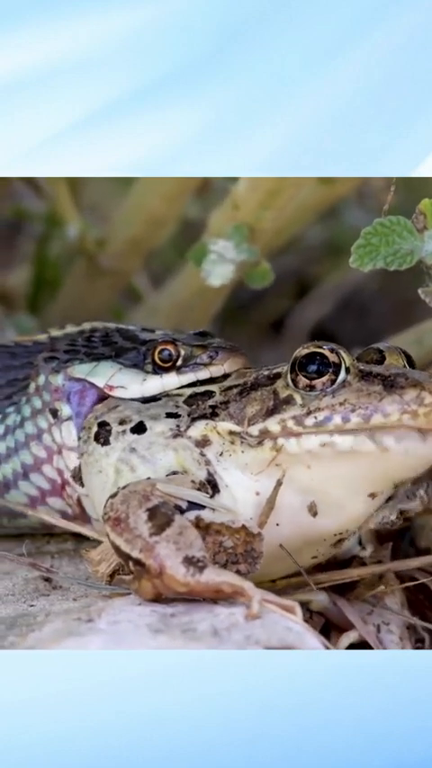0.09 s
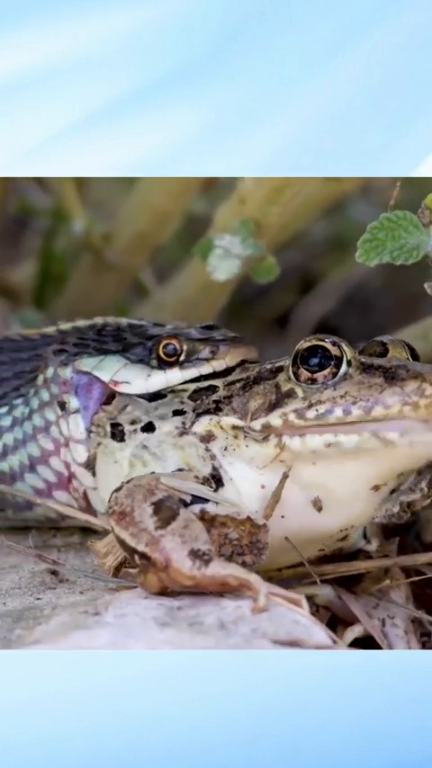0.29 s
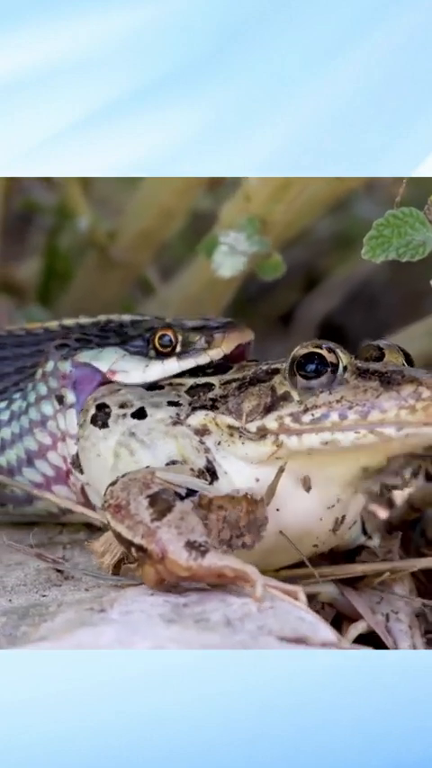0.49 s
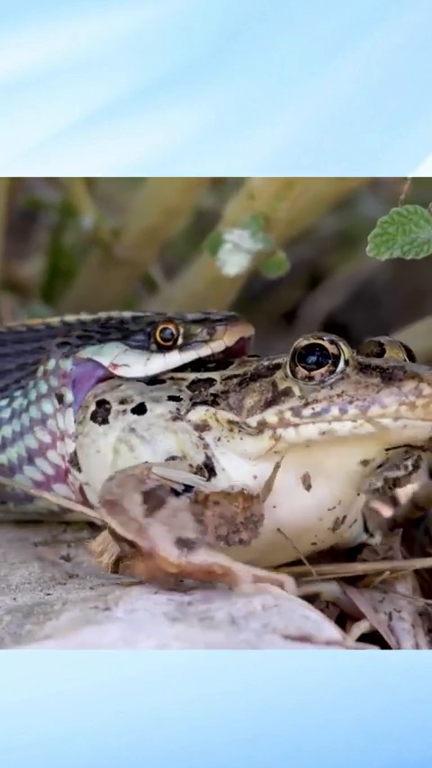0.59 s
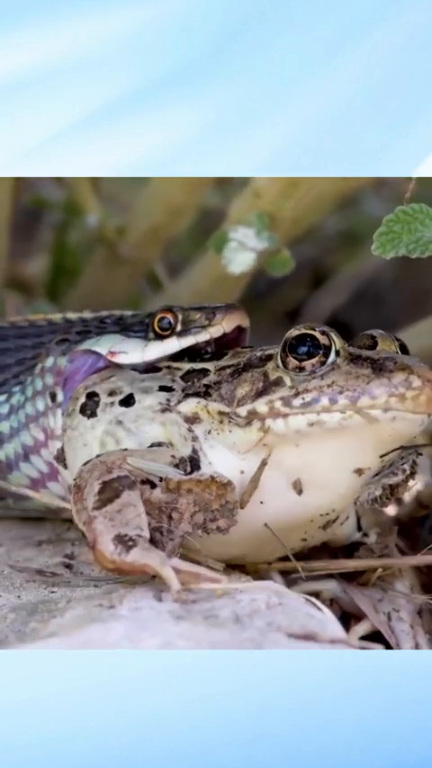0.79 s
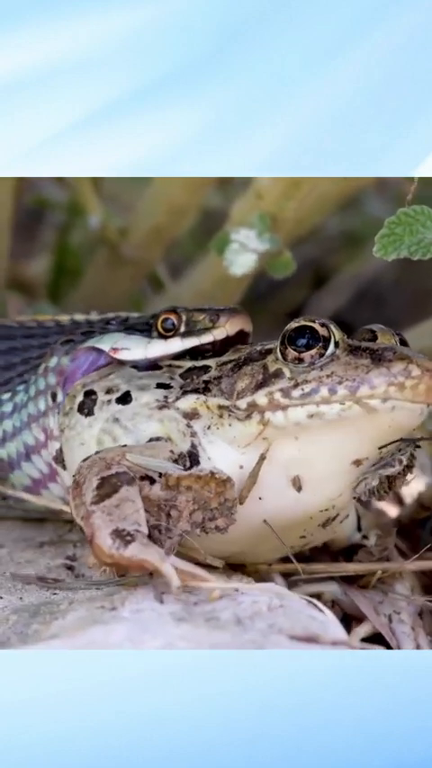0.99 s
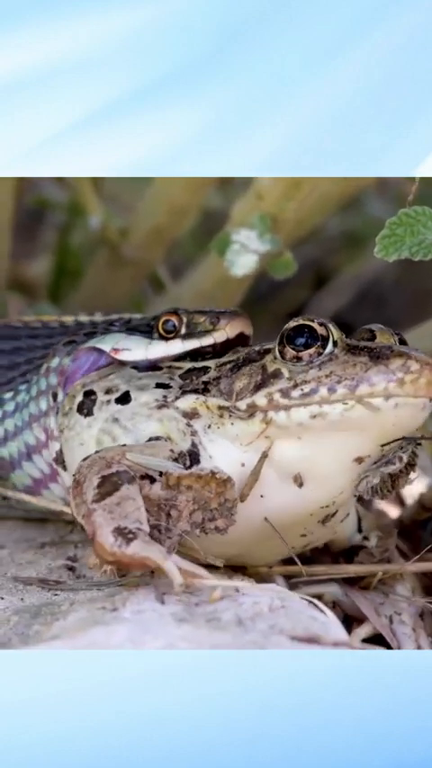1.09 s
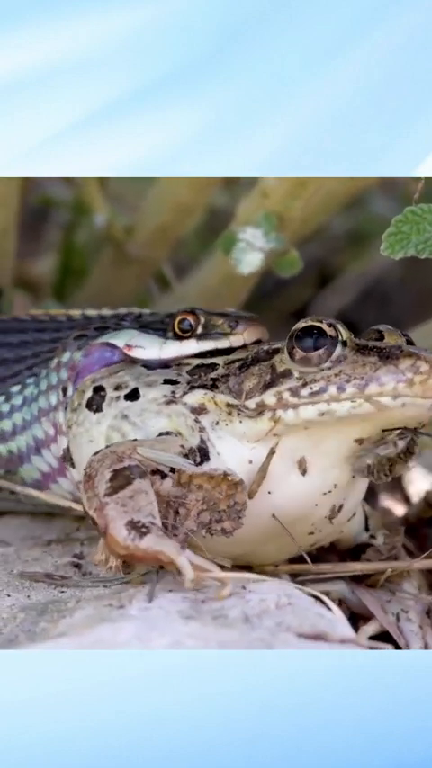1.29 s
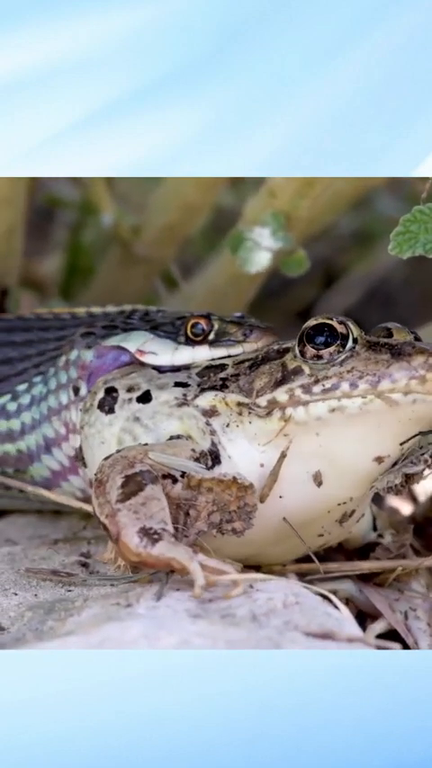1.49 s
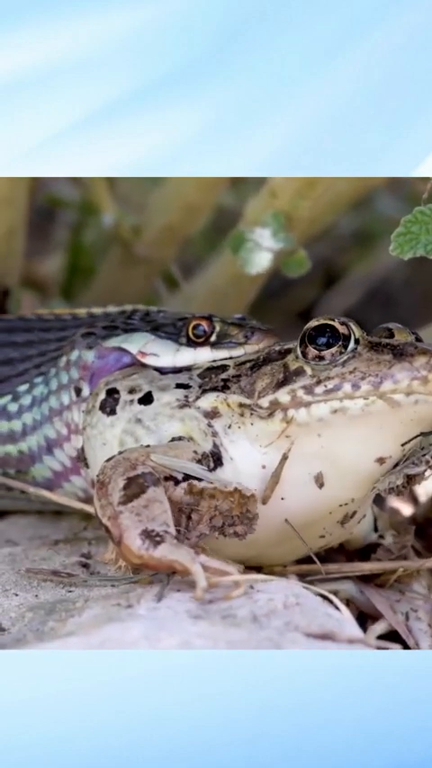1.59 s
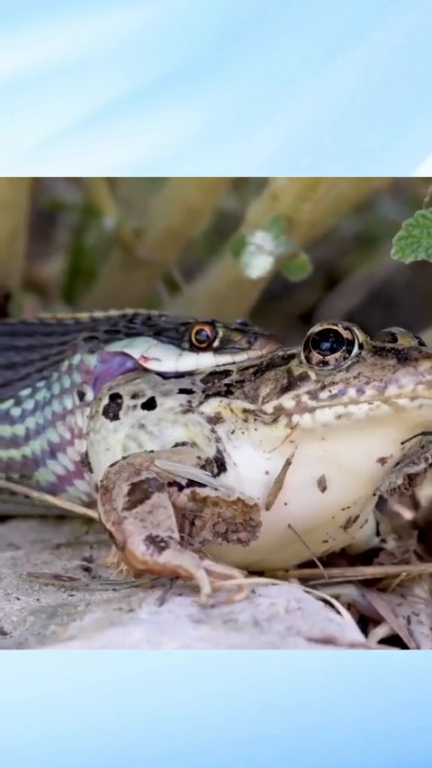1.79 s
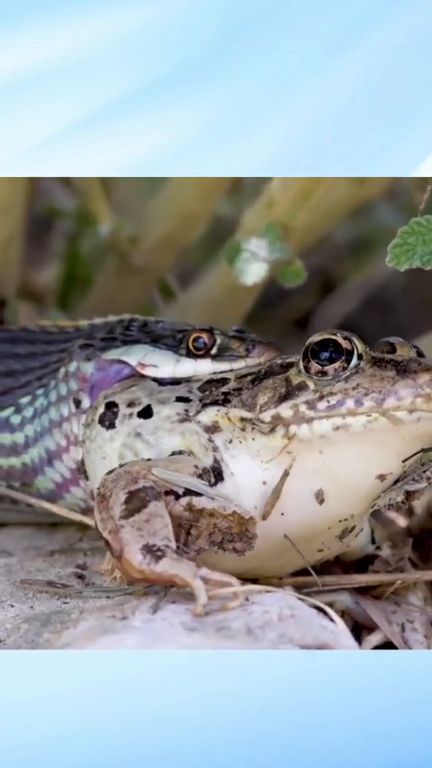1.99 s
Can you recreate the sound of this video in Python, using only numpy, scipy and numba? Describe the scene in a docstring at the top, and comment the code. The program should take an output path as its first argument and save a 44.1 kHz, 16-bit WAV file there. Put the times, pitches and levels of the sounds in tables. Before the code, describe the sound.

Close outdoor capture of a frog's scream in the first half second, rough and quiet at first, then piercing and pitched, dulling as the mouth closes; then tiny litter clicks over steady electrical-like hum and airy hiss.

```python
"""Scream of a captured frog

A frog held by a snake moans faintly, then breaks into one short wailing scream: a train of larynx
pulses, rough at first, that rises to a clear pitch and dulls as filters follow the closing mouth.
Dry litter ticks under the two animals as decaying resonant noise, with a faint short echo.
A low hum and a soft rumble, a high hiss and a thin whine go on behind, from sines and shaped noise."""
import sys
import numpy as np
from scipy import signal
from scipy.fft import rfft, irfft
from scipy.io import wavfile
from scipy.ndimage import uniform_filter1d
from numba import njit

SR = 44100
rng = np.random.default_rng(int(sys.argv[2]) if len(sys.argv) > 2 else 0)


def unload_audio(sound):
    """Save the sound as a 16-bit wav file, at the path given as the first command line argument."""
    columns = np.transpose(np.atleast_2d(sound))
    # keep every value between -1 and 1, then stretch to whole-number steps
    steps = np.round(np.clip(columns, -1, 1) * 32767)
    wavfile.write(sys.argv[1], SR, steps.astype(np.int16))


N = 88200
T = np.arange(N) / SR
CUTOFF_HZ = 15800  # upper limit of the whole sound


def from_db(db):
    """Level law: decibels to amplitude gain."""
    return 10 ** (np.asarray(db) / 20)


def rms_one(x):
    """Normalisation: scale to unit mean power."""
    return x / np.sqrt(np.mean(x ** 2) + 1e-20)


def in_time(rows):
    """Linear interpolation: each column of a curve at every sample."""
    time_s, *columns = np.transpose(rows)
    return [np.interp(T, time_s, column) for column in columns]


def at_hz(points, hz):
    """Logarithmic frequency scale: read a spectrum between its points."""
    point_hz, value = np.transpose(points)
    return np.interp(np.log(hz + 1), np.log(point_hz), value)


def during(span_s):
    """Gating: 1 inside a span of time, with soft edges."""
    inside = (T > span_s[0]) & (T < span_s[1])
    return uniform_filter1d(inside * 1., size=400)


def butter(x, hz, kind, order):
    """Causal filtering with a maximally flat passband."""
    return signal.sosfilt(signal.butter(order, hz, kind, fs=SR, output="sos"), x)


def resonate(x, hz, width_hz):
    """Fixed resonance: a damped pole pair with gain 1 on top."""
    r = np.exp(-np.pi * width_hz / SR)
    zeros = np.array([1, 0, -1]) * (1 - r * r) / 2
    poles = [1, -2 * r * np.cos(2 * np.pi * hz / SR), r * r]
    return signal.lfilter(zeros, poles, x + 1e-18)


@njit
def moving_filter(x, g, damping):
    """Time-varying two-pole filter, tuning g = tan(pi f / SR): low-pass and band-pass outputs."""
    low, band, a, b = np.zeros(len(x)), np.zeros(len(x)), 0., 0.
    for i in range(len(x)):
        v = (a + g[i] * (x[i] - b)) / (1 + g[i] * (g[i] + damping[i]))
        low[i], band[i] = b + g[i] * v, v * damping[i]
        a, b = 2 * v - a, 2 * low[i] - b
    return low, band


def moving_resonance(x, hz, width_hz):
    """Gliding resonance: the centre moves while the gain on top stays 1."""
    return moving_filter(x, np.tan(np.pi * hz / SR), width_hz / hz)[1]


def colour(x, spectrum):
    """Spectral shaping: weight each frequency component by a gain curve."""
    hz = np.arange(N // 2 + 1) * SR / N
    return irfft(rfft(x) * from_db(at_hz(spectrum, hz)), N)


def coloured_noise(spectrum):
    """Stationary random noise of a given spectrum, at unit rms."""
    return rms_one(colour(rng.standard_normal(N), spectrum))


def tones(rows):
    """Superposition of steady sines in random phase, from rows of pitch_hz and rms level_db."""
    out = np.zeros(N)
    for hz, db in rows:
        out += from_db(db) * np.sqrt(2) * np.sin(2 * np.pi * (hz * T + rng.random()))
    return out


# partials of the steady hum: pitch_hz [Hz], level_db [dB rms]
HUM_PARTIALS = [(59.2, -54), (74, -55.5), (88.8, -53), (120, -39), (145.8, -52), (177.3, -53.5)]


def hum():
    """Superposition of steady low sines."""
    return tones(HUM_PARTIALS)


# spectrum of the rumble: frequency_hz [Hz], relative_level_db [dB]
RUMBLE_SPECTRUM = [(25, -16), (45, -1), (65, -10), (110, -29), (180, -3.5), (260, 0.5), (400, -7.5),
                   (600, -13), (950, -11.5), (1500, -14), (2700, -12.5), (4500, -13.5), (5300, -14),
                   (6200, -9.5), (14000, -16.5), (16000, -10.5)]


def rumble():
    """Partly coherent stereo noise: a common part plus a weaker part in opposite phase."""
    level_db, side_db = -43.5, -16  # side relative to the common part
    common = coloured_noise(RUMBLE_SPECTRUM)
    side = from_db(side_db) * coloured_noise(RUMBLE_SPECTRUM)
    return from_db(level_db) * (common + side * [[1], [-1]])


# spectrum of the hiss: frequency_hz [Hz], relative_level_db [dB]
HISS_SPECTRUM = [(5000, -21), (6400, -15), (7200, 0.5), (8500, 1), (10500, -1), (11500, -11), (14000, -12)]
# level of the hiss noise: time_s [s], level_db [dB rms]
HISS_LEVEL_CURVE = [(0, -41.5), (.3, -44.5), (.55, -41), (.7, -39.5), (1.17, -40), (1.36, -43.5),
                    (1.55, -42), (1.7, -40.5), (2, -41.5)]
# faint steady tones in the hiss: pitch_hz [Hz], level_db [dB rms]
HISS_TONES = [(5642, -60.5), (5712, -67), (5911, -61), (6180, -64), (10885, -85), (11154, -64)]


def hiss():
    """Amplitude-modulated broadband noise with steady sines in it."""
    level_db, = in_time(HISS_LEVEL_CURVE)
    return from_db(level_db) * coloured_noise(HISS_SPECTRUM) + tones(HISS_TONES)


# spectrum of the narrow hiss: frequency_hz [Hz], relative_level_db [dB]
SMEAR_SPECTRUM = [(14000, -39), (14600, -9), (15300, -8), (15700, -1), (16000, -30)]
# tones inside the narrow hiss: pitch_hz [Hz], level_db [dB rms]
NARROW_HISS_TONES = [(15019, -57), (15288, -54), (15357, -57), (15556, -54)]


def whine():
    """Gated sine: the whine pauses, and a narrow band of noise and tones fills most of the gap."""
    pause_s, smear_s = (.24, 1.33), (.44, 1.33)
    whine_hz, whine_db, smear_db = 15331.6, -40, -43
    pure = tones([(whine_hz, whine_db)]) * (1 - during(pause_s))
    smear = from_db(smear_db) * coloured_noise(SMEAR_SPECTRUM) + tones(NARROW_HISS_TONES)
    return pure + smear * during(smear_s)


def background():
    """Superposition of hum, rumble, hiss and whine."""
    return hum() + rumble() + hiss() + whine()


def surroundings(x):
    """Diffuse scattering: faint, short echoes from stones and stalks, as decaying noise."""
    echo_db, echo_t60_s, echo_top_hz = -23, .13, 2600
    scatter = butter(rng.standard_normal(N), echo_top_hz, "low", order=2)
    scatter = scatter * from_db(-60 * T / echo_t60_s)
    unit_energy = scatter / np.sqrt(np.sum(scatter ** 2))
    return from_db(echo_db) * signal.fftconvolve(x, unit_energy)[:N]


# ticks in the dry litter: start_s [s], level_db [dB, gain at the start], pitch_hz [Hz], t60_s [s]
LITTER_TICKS = [(0.621, -43.5, 2820, 0.035), (.904, -46, 820, 0.13), (1.049, -41.5, 2690, 0.031),
                (1.259, -48, 2720, 0.041), (1.297, -48.5, 990, 0.096), (1.644, -41.5, 4120, 0.11),
                (1.655, -49.5, 850, 0.074), (1.831, -51, 2580, 0.022), (1.957, -47, 3480, .03)]


def litter():
    """Damped forced vibration: each tick is a dying scratch that rings a stalk or leaf."""
    width_hz, scratch_db = 83, -2
    out = np.zeros(N)
    for start_s, level_db, pitch_hz, t60_s in LITTER_TICKS:
        noise = rng.standard_normal(N)
        age_s = np.maximum(T - start_s, 0)
        ring = rms_one(resonate(noise, pitch_hz, width_hz))
        scratch = rms_one(butter(noise, [700, 5000], "band", order=1))
        tick = ring + from_db(scratch_db) * scratch
        out += tick * (T > start_s) * from_db(level_db - 60 * age_s / t60_s)
    return out


# pulse rate of the larynx before jitter: time_s [s], pitch_hz [Hz]
PULSE_RATE = [(0, 258), (.035, 284.7), (.075, 260.4), (.11, 238.3), (.135, 221.7), (.155, 240.3),
              (.2, 223.5), (.22, 227.3), (.25, 249.9), (.266, 263.7), (.292, 342.5), (.31, 355.3),
              (.336, 412.2), (.35, 435), (.37, 430.7), (.398, 418.3), (.43, 419), (.45, 405), (.468, 322),
              (.49, 319.2)]
# unsteadiness of the pulses: time_s [s], roughness [0-1]
ROUGHNESS = [(.06, .6), (.13, .65), (.2, .3), (.245, .35), (.28, .55), (.33, .35), (.36, .15), (.39, .09),
             (.42, .13), (.47, .45)]


def larynx():
    """Pulsed excitation, uneven in time and strength, with a noise puff per cycle and a fundamental."""
    jitter, shimmer_db = .038, 2.5  # scale of the rate and strength changes at roughness 1
    (pitch_hz,), (rough,) = in_time(PULSE_RATE), in_time(ROUGHNESS)
    wobble, shimmer = rms_one(butter(rng.standard_normal((2, N)), 292, "low", order=2))
    phase = 2 * np.pi * np.cumsum(pitch_hz * (1 + jitter * rough * wobble)) / SR
    # equal partials in phase make sharp pulses
    pulses = sum(np.cos(k * phase) * (k * pitch_hz < CUTOFF_HZ) for k in range(1, 70))
    pulses = pulses * np.sqrt(pitch_hz / pitch_hz.max())
    # the puff peaks one radian after each pulse
    breath = butter(rng.standard_normal(N), 1420, "high", order=2)
    puffs = rms_one(breath * (1 + np.cos(phase - 1))) * np.std(pulses)
    source = pulses * from_db(shimmer_db * rough * shimmer) + rough * puffs
    return source, puffs, np.cos(phase)


def throat(source, fundamental):
    """High-pass radiation of a small throat, with a weak fundamental and strained low noise added."""
    fundamental_db, flutter_db = -18.5, -26.5
    flutter = rms_one(butter(rng.standard_normal(N), (167, 546), "band", order=3))
    voice = butter(source, 774, "high", order=5)
    return voice + from_db(fundamental_db) * fundamental + from_db(flutter_db) * flutter


# ringing of the mouth cavity: time_s [s], centre_hz [Hz], boost_db [dB]
CAVITY_RINGING = [(.12, 1730, -1.5), (.21, 1760, 0), (.226, 2080, 11), (.241, 3160, 17), (.265, 3520, 13.5),
                  (.295, 3600, 4), (.35, 3170, 11), (.39, 3290, 8.5), (.425, 3520, 8), (.445, 2570, 13.5)]


def mouth(voice, edge_hz):
    """Cavity resonance and moving low-pass: the open mouth lets the treble out."""
    cavity_width_hz, lag_width_hz = 276, 560
    ring_hz, boost_db = in_time(CAVITY_RINGING)
    voice = voice + (from_db(boost_db) - 1) * moving_resonance(voice, ring_hz, cavity_width_hz)
    # all-pass: partials near the mouth's edge leave late
    voice = voice - 2 * moving_resonance(voice, edge_hz, lag_width_hz)
    for damping in (1.73, 1.506, 1.136, 0.83, 0.57):
        voice = moving_filter(voice, np.tan(np.pi * edge_hz / SR), np.full(N, float(damping)))[0]
    return voice


# faint buzz above the throat's range: centre_hz [Hz], half_width_hz [Hz, half of each resonator's
# bandwidth], level_db [dB], opening_power [power of the mouth opening that it follows]
BUZZ_BANDS = [(5600, 1030, -14, 2.42), (9300, 800, -14.5, 0.72), (11500, 940, -18.5, 1.1),
              (13200, 710, -11.5, 5)]


def buzz(source, puffs, edge_hz):
    """High formants: paired resonances of pulses and puffs, stronger as the mouth opens."""
    opening = edge_hz / edge_hz.max()
    raspy = source + .6 * puffs
    out = np.zeros(N)
    for centre_hz, half_width_hz, level_db, opening_power in BUZZ_BANDS:
        band = resonate(raspy, centre_hz, 2 * half_width_hz)
        band = resonate(band, centre_hz, 2 * half_width_hz)
        out += from_db(level_db) * opening ** opening_power * band
    return out


# effort of the cry: time_s [s], level_db [dB, gain of the voice]
CRY_EFFORT = [(0, -64), (.03, -52.5), (.06, -58), (.11, -44.5), (.16, -47), (.215, -46), (.235, -41.5),
              (.265, -37), (.29, -28), (.325, -25.5), (.355, -24), (.43, -23), (.455, -26), (.472, -33),
              (.5, -52), (.53, -80)]
# opening of the mouth: time_s [s], upper_edge_hz [Hz]
MOUTH_OPENING = [(0, 1900), (.13, 2480), (.21, 2270), (.24, 4000), (.28, 4780), (.31, 3990), (.35, 3550),
                 (.425, 3330), (.44, 2380), (.455, 1299), (.48, 900)]


def frog():
    """Source-filter principle: larynx pulses pass throat, cavity and mouth under a changing effort."""
    full_effort_db, buzz_follows = -22, .74  # the buzz changes by 0.74 dB per dB of effort
    source, puffs, fundamental = larynx()
    (effort_db,), (edge_hz,) = in_time(CRY_EFFORT), in_time(MOUTH_OPENING)
    voice = mouth(throat(source, fundamental), edge_hz)
    buzz_db = full_effort_db + buzz_follows * (effort_db - full_effort_db)
    return from_db(effort_db) * voice + from_db(buzz_db) * buzz(source, puffs, edge_hz)


def scene():
    """Superposition: the animals are close and straight ahead, before the background."""
    near = frog() + litter()
    return near + surroundings(near) + background()


# spectrum of the stereo widening: frequency_hz [Hz], level_db [dB]
WIDENING = [(2500, -78), (3000, -25), (3300, -14), (4300, -29), (5500, -2), (7500, -2), (11400, -2.5),
            (12400, -2), (15200, -16)]


def record(dry):
    """Decorrelation by delay: late treble is added left and taken away right; the top is cut steeply."""
    delay_s = .0203
    side = np.roll(colour(dry.mean(axis=0), WIDENING), int(delay_s * SR))
    steep_cut = signal.ellip(12, .1, 80, CUTOFF_HZ, fs=SR, output="sos")
    return signal.sosfilt(steep_cut, dry + side * [[1], [-1]])


dry = scene()
out = record(dry)
unload_audio(out)
```